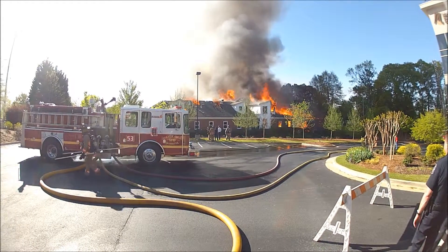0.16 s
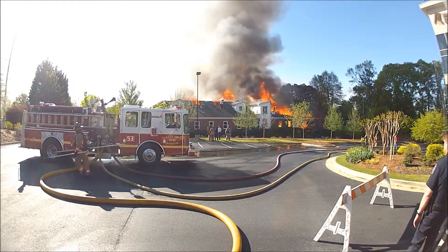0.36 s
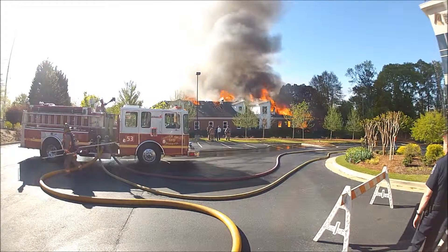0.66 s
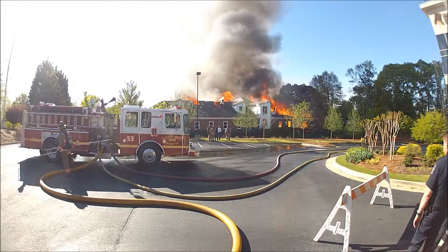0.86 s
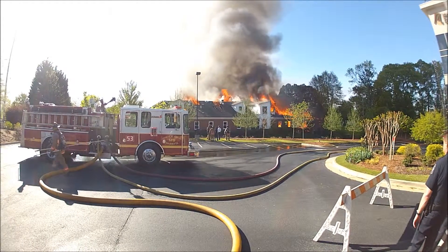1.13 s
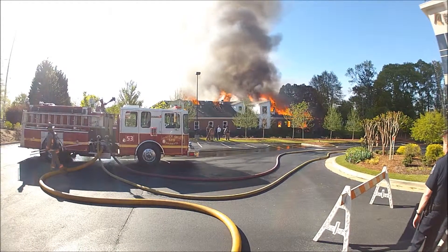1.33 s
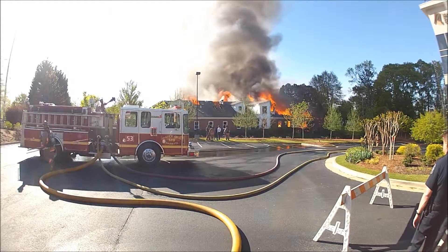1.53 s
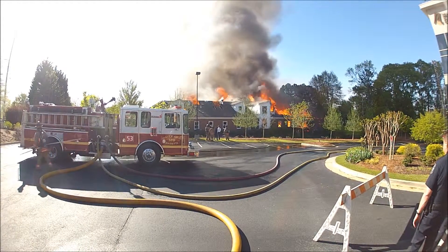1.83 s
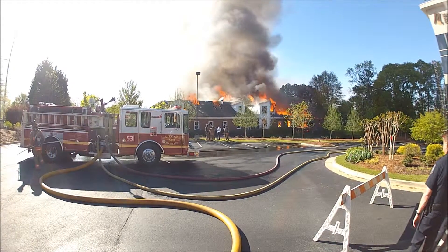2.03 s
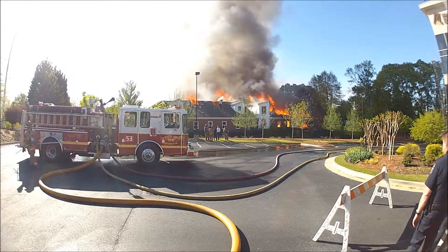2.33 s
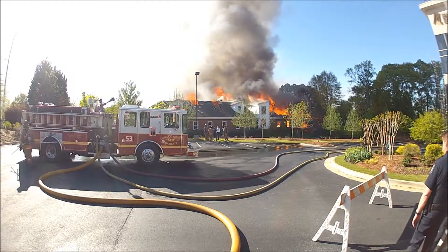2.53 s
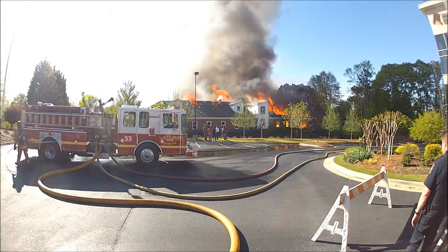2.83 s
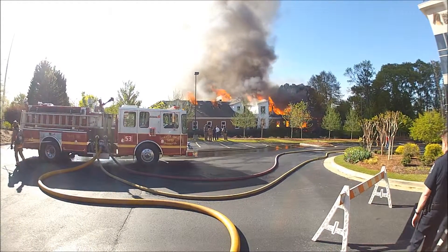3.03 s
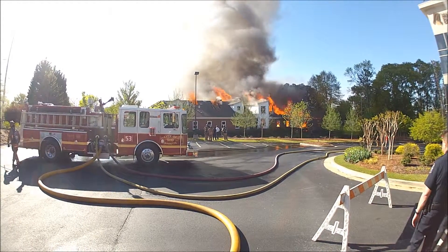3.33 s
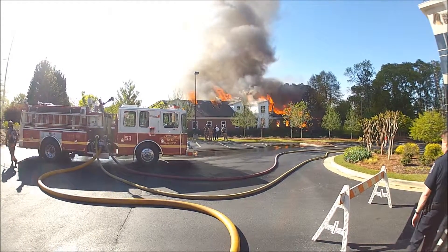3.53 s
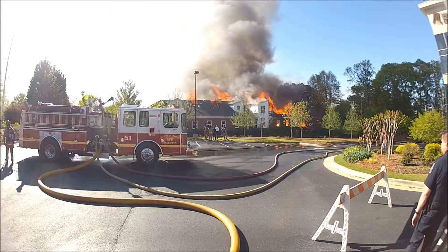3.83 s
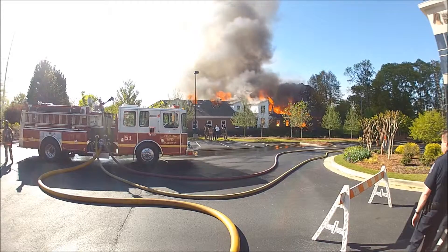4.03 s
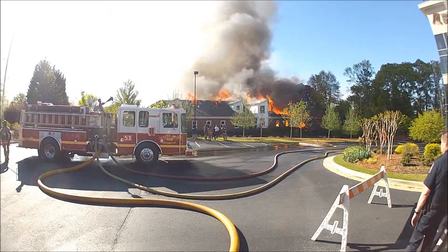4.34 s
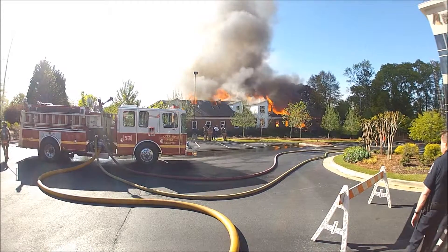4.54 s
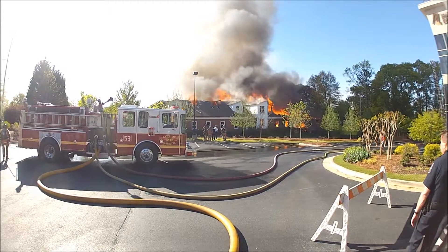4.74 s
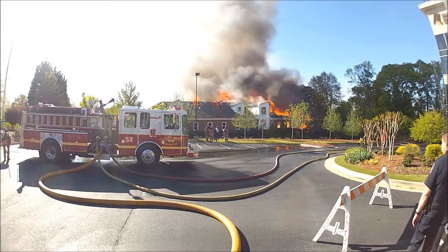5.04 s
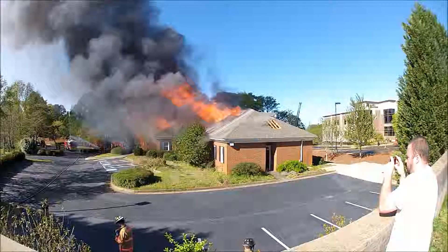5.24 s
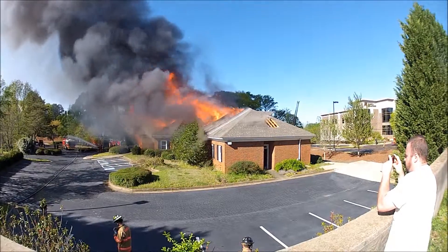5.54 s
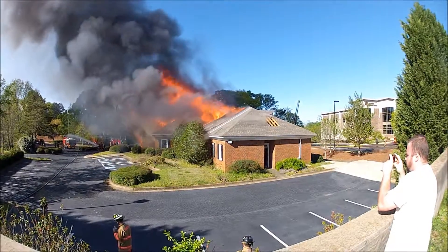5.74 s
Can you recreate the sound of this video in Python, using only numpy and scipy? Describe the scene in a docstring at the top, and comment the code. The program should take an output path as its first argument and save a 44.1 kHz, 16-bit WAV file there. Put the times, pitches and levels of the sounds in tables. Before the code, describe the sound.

Outdoors, a diesel fire engine runs its pump at one constant speed, its drone mixed with fan whir and the hiss of water under pressure. A house fire crackles farther back, with occasional snaps and thuds. Then close rubbing and a few loud knocks on the microphone's housing interrupt. After a tiny gap and a soft pop, the engine hums lower and farther off, with crackling and one more brush on the housing.

```python
"""A fire engine's six-cylinder diesel holds a governed 1200 rpm for its pump, across a car park, with a
whirring fan, a hissing valve and a rush of air and water. A burning house crackles and thuds behind it.
Near 4.7 s a hand starts to rub the camera's case; from 5.05 s knocks set the case ringing. At 5.32 s the
sound drops out for an instant. It resumes further off with a soft pop, a lower engine hum, the fire
and one more brush over the case."""
import sys
import numpy as np
from scipy import signal
from scipy.fft import rfft, irfft, next_fast_len
from scipy.io import wavfile
from scipy.ndimage import uniform_filter1d

SR = 44100
rng = np.random.default_rng(int(sys.argv[2]) if len(sys.argv) > 2 else 0)


def file_out(sig):
    """Save sig as 16-bit WAV at sys.argv[1]."""
    # one column per channel
    cols = np.atleast_2d(sig).T
    # limit, then scale
    lim = np.clip(cols, -1, 1)
    pcm = np.round(lim * 32767).astype(np.int16)
    wavfile.write(sys.argv[1], SR, pcm)


N = 259749
T = np.arange(N) / SR
CYCLE_HZ = 10.017  # four-stroke cycles a second, each two crank turns and six firings


def undb(db):
    """Decibels to amplitude ratio."""
    return 10 ** (np.asarray(db) / 20)


def level(x, db):
    """Normalisation to an rms level."""
    return x * undb(db) / np.sqrt(np.mean(x ** 2))


def noise():
    """Gaussian white noise."""
    return rng.standard_normal(N)


def colour(x, points):
    """Minimum-phase filter through (Hz, dB) points, made by folding the cepstrum."""
    hz, db = np.transpose(points)
    f = np.maximum(np.fft.rfftfreq(2 * N, 1 / SR), 1)
    skirts = np.minimum(f / hz[0], 1) ** 2 * np.minimum(hz[-1] / f, 1) ** 2
    curve = undb(np.interp(np.log(f), np.log(hz), db)) * skirts
    size = next_fast_len(2 * N)
    gain = np.interp(np.fft.rfftfreq(size, 1 / SR), f, curve)
    cepstrum = irfft(np.log(gain), size)
    cepstrum[1:size // 2] *= 2
    cepstrum[size // 2:] = 0
    return irfft(rfft(x, size) * np.exp(rfft(cepstrum)), size)[:N]


def band(lo_hz, hi_hz):
    """Band-limited noise, rms 1."""
    return level(signal.sosfilt(signal.butter(2, [lo_hz, hi_hz], "band", fs=SR, output="sos"), noise()), 0)


def walk(rate):
    """Random modulation: values held for 1 / rate s and smoothed twice, rms 1."""
    k = int(SR / rate)
    held = np.repeat(rng.standard_normal(N // k + 2), k)
    return level(uniform_filter1d(uniform_filter1d(held, k), k)[:N], 0)


def fade(start, t60):
    """Exponential decay from a sudden onset, 60 dB in t60 seconds."""
    return (T >= start) * np.exp(-np.log(1000) * np.clip((T - start) / t60, 0, 10))


def swell(middle, half):
    """Gaussian envelope: 1 at its middle, 1/e a half-length away."""
    return np.exp(-np.minimum(((T - middle) / half) ** 2, 50))


def tones(rows):
    """Random modulation of amplitude and phase spreads each tone into a narrow band."""
    return sum(level(np.real((walk(width) + 1j * walk(width)) * np.exp(2j * np.pi * hz * T)), db)
               for hz, width, db in rows)


def diesel(waver_db=1.5, slip_cycles=.0015, locked_db=-62, loose_db=-62, clatter_waver_db=1.15):
    """Periodic firing gives harmonics of the cycle rate; the block's clatter is part periodic, part random."""
    # Each row: multiple of the cycle rate, level in dB. The cylinders fire at multiple 6.
    orders = [(6, -66.5), (8, -85), (9, -50), (10, -60), (11, -71.5), (12, -59), (13, -65), (15, -67.5),
              (16, -63.5), (20, -73), (21, -66.5), (30, -76), (32, -71), (37, -76.5), (41, -74), (51, -75),
              (54, -70.5), (67, -77.5), (69, -72), (73, -71), (78, -77.5), (81, -73.5), (88, -79.5),
              (102, -73.5), (106, -80.5), (111, -84)]
    # Each row: frequency in Hz, relative spectral density in dB.
    block_spectrum = [(130, -3), (300, 1.5), (450, -4), (600, -11), (760, -6.5), (1050, -1.5), (1380, -6.5),
                      (1620, 0.5), (2000, -12.5), (3000, -11)]
    cycles = CYCLE_HZ * T + slip_cycles * walk(2.01)  # the governor hunts very slightly
    drone = 0
    for k, db in orders:
        waver = waver_db * np.sqrt(k / 20) * walk(3.97)  # moving air disturbs short waves most
        drone = drone + undb(db + waver) * np.sqrt(2) * np.sin(2 * np.pi * (k * cycles + rng.random()))
    bins = int(SR / CYCLE_HZ) // 2
    one_cycle = irfft(np.exp(2j * np.pi * rng.random(bins)) * (.5 + rng.random(bins)))
    pattern = np.interp(cycles, np.arange(len(one_cycle)) / len(one_cycle), one_cycle, period=1)
    lowpass = signal.butter(2, 1100, fs=SR, output="sos")  # the low part repeats best
    locked = signal.sosfilt(lowpass, colour(pattern, block_spectrum))
    clatter = level(locked, locked_db) + level(colour(noise(), block_spectrum), loose_db)
    return drone + clatter * undb(clatter_waver_db * walk(5.6))


def fan(blade_hz=292.6, blade_db=-64.5, drift=.014, waver_db=1.8, flutter_hz=22, flutter_db=-63):
    """The cooling fan's blade-passing tone drifts, flutters and swells among weaker fan and pump tones."""
    # Each row: time of the peak in seconds, half-length in seconds, rise in dB.
    swells = [(.37, 0.066, 11.5), (1.043, 0.05, 10), (2.005, .17, 4.5), (3.007, 0.034, 14), (4.047, .1, 7)]
    # Each row: frequency in Hz, width of its wander in Hz, level in dB.
    fan_and_pump = [(116, .5, -66), (195.5, 0.82, -67.5), (212.6, 5.4, -73), (395, 3.7, -75),
                    (435.5, 12, -68.5), (525.5, 12, -73), (547, 22, -71), (712, 26, -70)]
    hz = blade_hz * (1 + drift * walk(9))
    db = blade_db + waver_db * walk(12) + sum(rise_db * swell(s, half) for s, half, rise_db in swells)
    blades = undb(db) * np.sqrt(2) * np.sin(2 * np.pi * np.cumsum(hz) / SR)
    return blades + tones([(blade_hz, flutter_hz, flutter_db)]) + tones(fan_and_pump)


def valve(hz=2630, width_hz=280, db=-62.5, flutter_db=1.5):
    """Flow noise: water under pressure sings through a valve in a narrow hiss."""
    return band(hz - width_hz / 2, hz + width_hz / 2) * undb(db + flutter_db * walk(40))


def rush(spectrum, db, throb=0.138, gust_db=-0.5):
    """Turbulence makes broadband noise, modulated a little by the firings and the breeze."""
    firing = 1 + throb * np.cos(2 * np.pi * 6 * CYCLE_HZ * T)
    return level(colour(noise() * firing * undb(gust_db * walk(14)), spectrum), db)


def fire(snap_db=-7.5, ring_db=-4.5, ring_t60=0.014, crack_t60=0.015, echo_db=-23, echo_t60=0.084,
         crackle_db=-65.0, per_second=85, spread_db=4):
    """Burning timber emits impulses: loud cracks snap, ring and echo over a Poisson crackle of small ones."""
    # Each row: start in seconds, relative level in dB, ring frequency in Hz.
    cracks = [(.451, -24.5, 3850), (.616, -43.5, 3640), (0.953, -34, 3300), (1.72, -29.5, 3550),
              (2.0969, -35.5, 2950), (2.9728, -33.5, 3340), (3.22, -32, 2970), (3.234, -34, 3640),
              (3.4698, -38.5, 3700), (3.7647, -43, 5000), (4.1627, -37.5, 3390), (4.2123, -35.5, 4970),
              (4.241, -38.5, 3500), (4.9296, -30.5, 3024), (4.938, -32, 3730), (5.529, -40, 3680),
              (5.676, -36, 2610)]
    # Each row: frequency in Hz, relative spectral density in dB.
    crack_spectrum = [(300, -13), (1100, -12), (1600, -8), (2600, -0.5), (3800, 0.5), (4500, -1),
                      (5200, -3), (8000, -7), (11000, -28.5), (15000, -25.5)]
    snaps = sum(undb(db) * (fade(s, crack_t60) + undb(echo_db) * fade(s, echo_t60)) for s, db, _ in cracks)
    rings = sum(undb(db) * fade(s, ring_t60) * np.sin(2 * np.pi * hz * (T - s)) for s, db, hz in cracks)
    onsets = rng.random(N) < per_second / SR
    pops = onsets * undb(spread_db * np.minimum(rng.exponential(size=N), 2.3))
    crackle = level(signal.fftconvolve(pops, fade(0, crack_t60))[:N], crackle_db)
    hiss = level(colour(noise(), crack_spectrum), 0)
    return hiss * (undb(snap_db) * snaps + crackle) + undb(ring_db) * rings


def thuds(edge_ratio=1.49):
    """Distant dull knocks: damped bursts of noise, over an octave wide."""
    # Each row: start in seconds, level in dB, centre frequency in Hz, t60 in seconds.
    bursts = [(.451, -46, 497, .03), (0.578, -43, 238, 0.1), (2.534, -44, 210, 0.17),
              (2.97, -45, 645, 0.13), (2.996, -50.5, 520, 0.77), (4.571, -53, 299, 0.18),
              (4.66, -49.5, 229, 0.26)]
    return sum(undb(db) * band(hz / edge_ratio, hz * edge_ratio) * fade(s, t60) for s, db, hz, t60 in bursts)


def hand(spectrum, grain_db=3):
    """Sliding friction: skin rubs unevenly over the case and rocks it, each stroke speeding then slowing."""
    # Each row: time of the peak and half-length in seconds, rubbing level and rumble level in dB.
    strokes = [(4.72, 0.18, -72, -53), (5.032, 0.067, -52, -54), (5.164, 0.18, -53.5, -39.5),
               (5.295, 0.033, -42, -38), (5.447, 0.038, -44, -48), (5.513, .03, -56.5, -52.5)]
    # Each row: frequency in Hz, relative spectral density in dB.
    rumble_spectrum = [(10, 0), (35, 9.5), (100, -3.5), (260, -7), (450, -26.5), (1500, -49)]
    rub = level(colour(noise() * undb(grain_db * walk(300)), spectrum), 0)
    rumble = level(colour(noise(), rumble_spectrum), 0)
    return sum(swell(s, half) * (undb(rub_db) * rub + undb(rumble_db) * rumble)
               for s, half, rub_db, rumble_db in strokes)


def blows(click_t60=0.0098, thump_s=0.0021, build_s=.0006, rebound=0.69, click_gain_db=7, lowest_hz=225):
    """Each impact excites the case's modes, clicks, and shoves the microphone in a swing that rebounds."""
    # Each row: time in seconds, then relative levels of ring, click and thump in dB.
    impacts = [(5.0547, -2.5, -7.5, -41), (5.106, -29.5, -29, -48), (5.1291, -18, -20.5, -9),
               (5.174, -46, -53, -27.5), (5.319, -57, -56, -24.5)]
    # Each row: frequency in Hz, relative level in dB, t60 in seconds.
    case_modes = [(270, -34, 0.22), (333, -30.5, .11), (382, -9, 0.021), (489, -4.5, 0.013),
                  (846, -1, 0.0083), (967, 0, 0.011), (1228, -12.5, .016), (2250, 0.5, 0.0086),
                  (3000, -9.5, 0.0067), (3716, -8, 0.01)]
    # Each row: frequency in Hz, relative spectral density in dB.
    click_spectrum = [(200, -20), (700, -11), (1050, -4.5), (1500, -1.5), (2200, 0), (3600, -2), (5000, -7),
                      (6200, -11.5), (9500, -4), (12000, -15.5), (15000, -10.5)]
    grit = level(colour(noise(), click_spectrum), click_gain_db)
    knocks, thumps = 0, 0
    for s, ring_db, click_db, thump_db in impacts:
        age = np.maximum(T - s, 0)
        ring = sum(undb(db) * fade(s, t60) * np.sin(2 * np.pi * hz * age) for hz, db, t60 in case_modes)
        contact = 1 - np.exp(-age / build_s)
        knocks = knocks + contact * (2 * undb(ring_db) * ring + undb(click_db) * grit * fade(s, click_t60))
        swing = np.minimum(((T - s) / thump_s) ** 2, 100)
        thumps = thumps + undb(thump_db) * (1 - rebound * swing) * np.exp(-swing / 2)
    return signal.sosfilt(signal.butter(3, lowest_hz, "high", fs=SR, output="sos"), knocks) + thumps


def far_hum():
    """The engine from further off: narrowband tones, a low hum under faint high ones."""
    # Each row: frequency in Hz, width of its wander in Hz, level in dB.
    partials = [(76, 1.98, -55), (1010, 40, -76), (1570, 16, -76), (2470, 160, -66), (3640, 200, -74)]
    return tones(partials)


def port(x):
    """Resonances and antiresonances of the microphone port colour the airborne sound."""
    # Each row: frequency in Hz, width in Hz, gain in dB.
    peaks_and_dips = [(3740, 260, 2.5), (4480, 1100, -6.5), (5010, 540, 4), (5970, 606, -19),
                      (7700, 300, -8.5), (8320, 840, 5), (9395, 460, 10), (14630, 740, 13)]
    for hz, width, db in peaks_and_dips:
        b, a = signal.iirpeak(hz, hz / (width * undb(-db / 2)), fs=SR)
        x = x + (undb(db) - 1) * signal.lfilter(b, a, x)
    return x


def scene(dropout_s=5.324, resume_s=5.36, far_fire_db=-4, pop_db=-38, pop_t60=0.046):
    """Superposition of the sources at the near position and, after a gap, at the far one."""
    # Spectra of the rush of air and water and of the hand's rubbing, at each position.
    # Each row: frequency in Hz, relative spectral density in dB.
    near_rush = [(8, -10), (18, 3.5), (45, -6), (80, -5.5), (170, -17.5), (330, -22.5), (450, -23),
                 (750, -20), (1100, -24), (1400, -32.5), (2100, -23.5), (3600, -26), (4400, -29),
                 (15000, -43.5)]
    near_rub = [(200, 9), (650, -7), (1100, -6), (1900, 3.5), (2700, -1.5), (3800, -1), (5000, -6.5),
                (7000, -10), (8300, -11.5), (10000, -18), (11500, -26), (14500, -22)]
    far_rush = [(18, -1.5), (80, -3), (150, -12.5), (300, -17.5), (600, -23), (1250, -32), (1620, -22),
                (2000, -28), (2550, -22), (3200, -32.5), (5000, -31.5), (9500, -40), (11500, -48.5),
                (14800, -46)]
    far_brush = [(200, -4), (700, -7.5), (1100, 4), (1450, -5), (2200, 2), (2700, -2), (3700, -4.5),
                 (5000, -17), (7000, -19), (8300, -16), (10000, -17.5), (11500, -26), (14500, -23)]
    flames = fire()
    air = diesel() + fan() + valve() + rush(near_rush, db=-52.5) + flames + thuds() + hand(near_rub)
    near = port(air) + blows()  # blows reach the microphone through the case
    far = port(far_hum() + rush(far_rush, db=-52.0) + undb(far_fire_db) * flames + hand(far_brush))
    closing = np.clip((dropout_s - T) / 0.0028, 0, 1)
    pop = undb(pop_db) * fade(resume_s, pop_t60)
    noise_floor = rush(far_rush, db=-74.0)
    return (near * closing + far * (T > resume_s) + pop + noise_floor)[None]


def record(dry):
    """Overload flattens the hardest blow's peaks; a steep low-pass removes the top treble."""
    lowpass = signal.ellip(10, .2, 90, 15350, fs=SR, output="sos")
    return signal.sosfilt(lowpass, np.clip(dry, -1, 1))


dry = scene()
out = record(dry)
file_out(out)
```